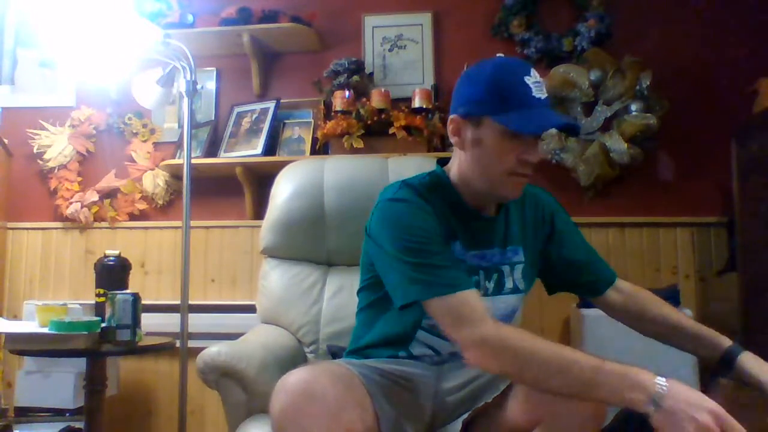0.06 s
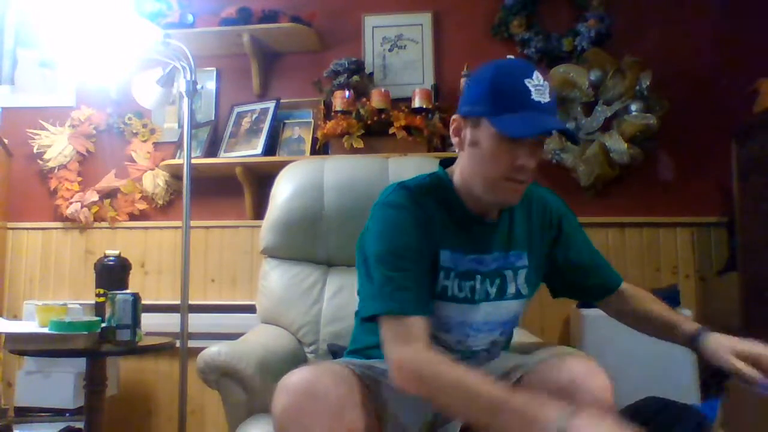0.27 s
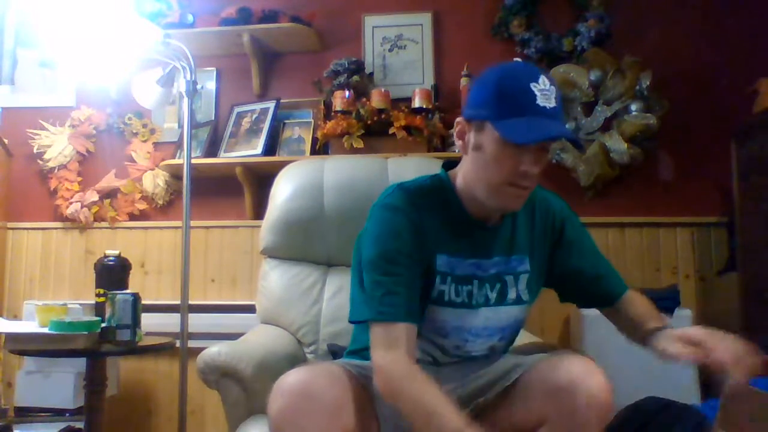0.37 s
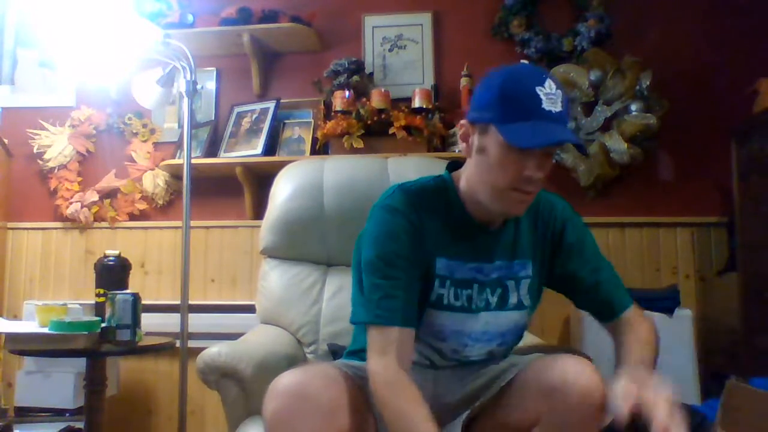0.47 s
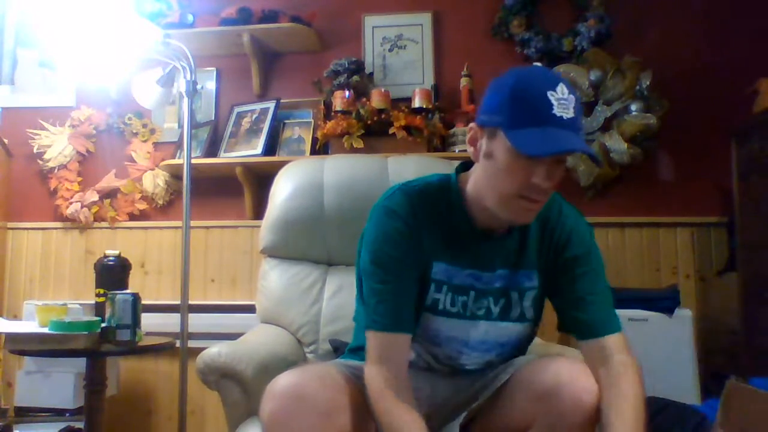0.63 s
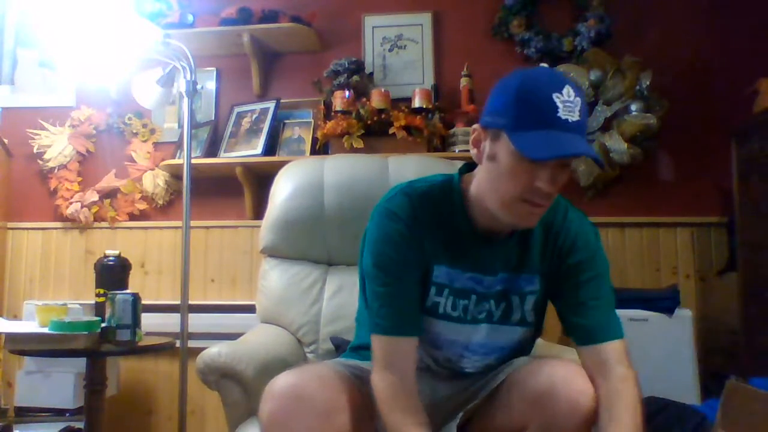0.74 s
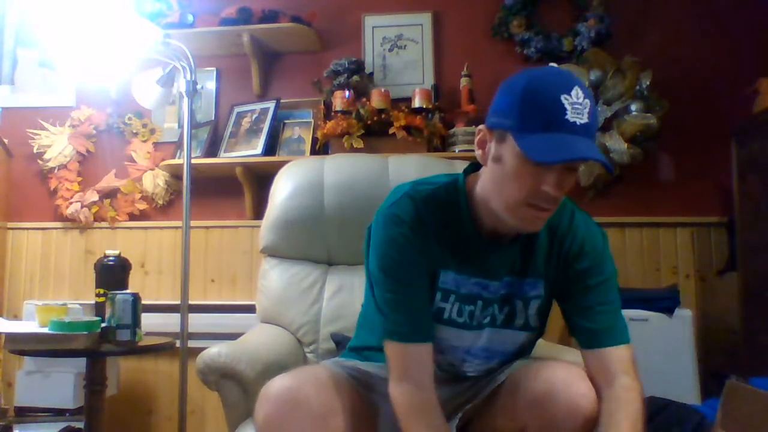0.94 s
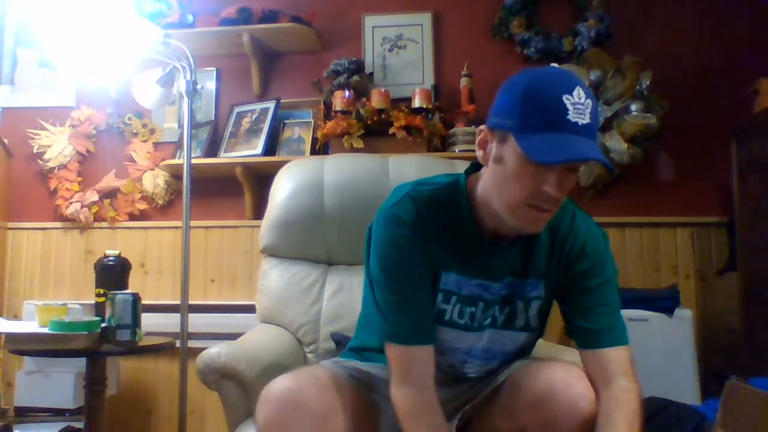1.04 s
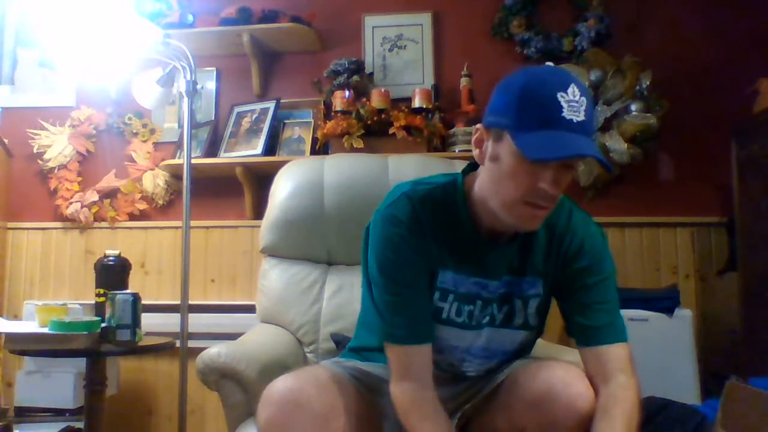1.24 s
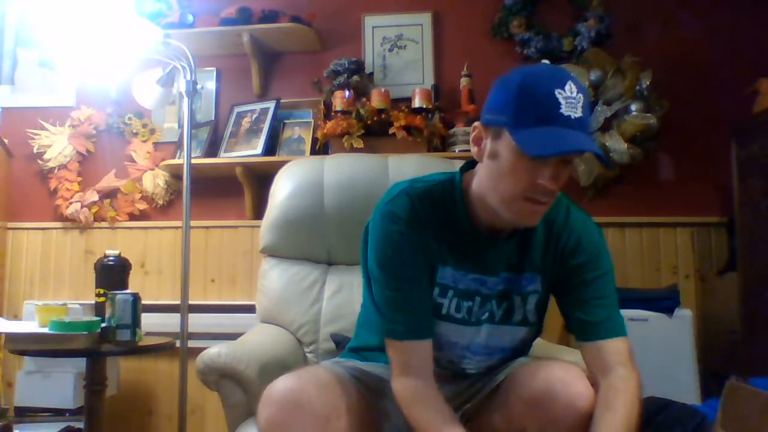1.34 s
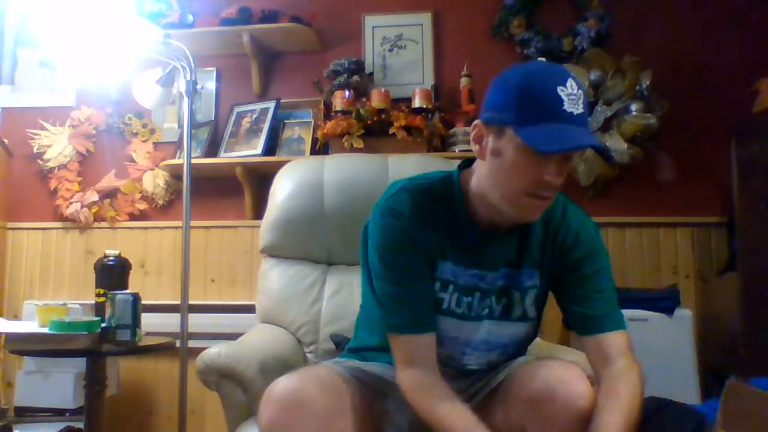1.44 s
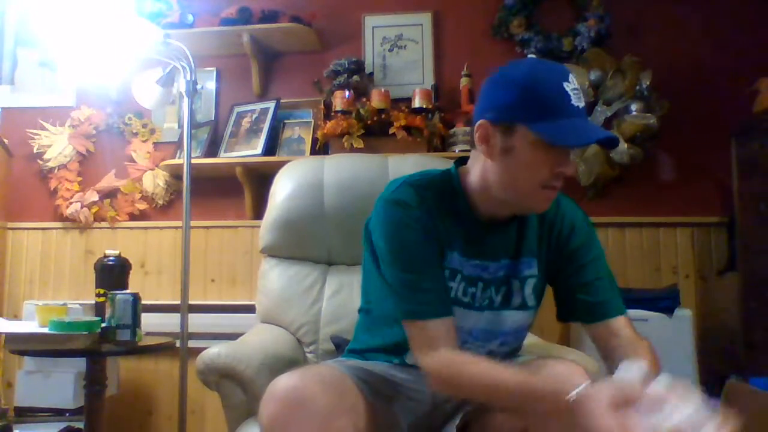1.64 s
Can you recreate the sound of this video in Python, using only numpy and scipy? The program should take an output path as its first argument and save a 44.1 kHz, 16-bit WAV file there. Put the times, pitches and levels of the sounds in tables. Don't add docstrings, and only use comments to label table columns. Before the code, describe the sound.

Foam packing pieces rustle and crunch in a cardboard box: first a short slide and low hollow thud as it lands, then repeated dense scoops with tiny squeaks, heard by a close webcam microphone in a small room.

```python
import sys
import numpy as np
from scipy import signal
from scipy.fft import rfft, irfft, dct, next_fast_len
from scipy.io import wavfile
from scipy.ndimage import uniform_filter1d

SR = 44100
rng = np.random.default_rng(int(sys.argv[2]) if len(sys.argv) > 2 else 0)


def undo_db(level):
    steps = np.asarray(level, float) / 20
    return 10 ** steps


def to_wav(sig):
    pcm = np.clip(np.atleast_2d(sig), -1, 1) * 32767
    pcm = np.round(pcm).astype(np.int16)
    wavfile.write(sys.argv[1], SR, pcm.T)


N = 74970


def unit(x):
    return x / np.sqrt(np.mean(x ** 2) + 1e-20)


def filtered(x, points):
    m = next_fast_len(N + SR // 4)
    hz, db = np.transpose(points)
    gain_db = np.interp(np.log(np.fft.rfftfreq(m, 1 / SR) + 1), np.log(hz + 1), db)
    return irfft(rfft(x, m) * undo_db(gain_db), m)[..., :N]


def rush(spectrum, patchy_db):
    z = signal.stft(rng.standard_normal(N + 512), nperseg=256)[2]
    field = uniform_filter1d(rng.standard_normal(z.shape), size=4, axis=0)
    field = uniform_filter1d(field, size=5, axis=1)
    noise = signal.istft(z * undo_db(patchy_db * unit(field)), nperseg=256)[1][:N]
    return unit(filtered(noise, [(20, -120)] + list(spectrum) + [(20000, -120)]))


def room_tone():
    # freq_hz, density_db [dB per Hz]
    tone_spectrum = [(40, -32), (100, -15), (330, -13), (1050, -14), (1600, -14.5), (2200, -27),
                     (5000, -46), (11000, -42)]
    whine = undo_db(-71) * np.sin(2 * np.pi * 3370 * np.arange(N) / SR)
    return undo_db(-54) * rush(tone_spectrum, patchy_db=1.0) + whine


def room(x):
    # freq_hz, t60_s
    decay = [(100, 0.84), (1000, 0.41), (8000, 0.32)]
    hz, t, z = signal.stft(rng.standard_normal(SR // 2), SR, nperseg=256)
    f, t60 = np.transpose(decay)
    t60 = np.interp(np.log(hz + 1), np.log(f), t60)[:, None]
    tail = signal.istft(z * undo_db(-60 * t / t60), SR, nperseg=256)[1]
    return signal.fftconvolve(np.pad(x, (300, 0)), tail / np.linalg.norm(tail))[:N]


def strokes():
    # peak_s, level_db, rise_s, hold_s, dig [0-1, deep digs are duller]
    hand_strokes = [(0.11, -38.5, 0.088, 0.023, 0.46), (0.182, -40, 0.038, .03, 1),
                    (0.215, -32, 0.026, 0.052, 0.7), (.546, -39, 0.0041, 0.0086, 0),
                    (0.567, -31.5, 0.023, 0.0084, 0.05), (0.62, -34.5, 0.014, 0.0073, 0),
                    (0.738, -40, 0.044, 0.025, 0), (0.804, -27, 0.04, 0.054, 0.57),
                    (0.887, -31.5, 0.023, 0.01, 0), (0.956, -24, 0.079, 0.032, 0.79),
                    (1.023, -32, 0.058, 0.039, 0.9), (1.111, -33, 0.06, .03, 1),
                    (1.139, -29.5, 0.067, 0.062, 0.73), (1.261, -29, 0.057, 0.01, 0.59),
                    (1.301, -33, 0.04, 0.085, 0.58), (1.41, -29, 0.01, 0.022, .1),
                    (1.462, -34.5, 0.05, 0.056, 0.24), (1.616, -38.5, 0.072, .012, 0.1)]
    rise_shape, release_t60_s = 0.72, 0.19
    t = np.arange(N) / SR
    peak, db, rise, hold, dig = np.transpose(hand_strokes)[:, :, None]
    swell = np.clip(1 - (peak - t) / rise, 0, 1) ** rise_shape
    since_hold = np.clip(t - peak - hold, 0, None)
    power = (swell * undo_db(db - 60 * since_hold / release_t60_s)) ** 2
    dig = np.clip(dig, 0, 1)
    return np.sqrt((power * (1 - dig)).sum(0)), np.sqrt((power * dig).sum(0))


def landing():
    # start_s, level_db
    contacts = [
        (0.202, -33),
        (.2115, -16.5),
        (.221, -11.5),
        (.237, -15.5),
        (.256, -21.5),
        (.275, -31.5),
        (.294, -25.5),
        (.316, -26.5),
        (.345, -35.5),
        (0.386, -38),
    ]
    # pitch_hz, level_db, t60_s
    walls = [(35, -13, .15), (96.9, -11.5, 0.22), (135.6, -10, 0.26), (176.3, -12, 0.3),
             (190.4, -3.5, 0.24), (247, 7.5, 0.088), (311, -13, 0.156), (333.5, -24, 0.82),
             (441, -21, 0.13), (603, -12, 0.062), (684, -7, 0.056), (749, -6, 0.07), (888, -22, 0.093),
             (1157.5, -18.5, 0.19)]
    # freq_hz, density_db [dB per Hz]
    flap = [(200, -27), (400, -4), (750, -3), (1100, -10.5), (2400, -13.5), (3200, -28), (6000, -40)]
    attack_s, flap_db, flap_t60_s, detune = 0.0018, -26, 0.24, 0.022
    t = np.arange(SR) / SR
    ringing, slap_power = np.zeros(N + SR), np.zeros(N + SR)
    for s, db in contacts:
        ring = np.zeros(SR)
        for hz, level, t60 in walls:
            decay = undo_db(level + rng.normal(0, 1) - 60 * t / t60)
            ring += decay * np.sin(2 * np.pi * hz * (1 + detune * rng.normal()) * t)
        start = round(s * SR)
        ringing[start:][:SR] += undo_db(db) * ring * (1 - np.exp(-t / attack_s))
        slap_power[start:][:SR] += undo_db(db - contacts[1][1] - 60 * t / flap_t60_s) ** 2
    return ringing[:N] + undo_db(flap_db) * np.sqrt(slap_power[:N]) * rush(flap, patchy_db=3.0)


def settling():
    # start_s, level_db
    flap_ticks = [
        (.36, -46),
        (.425, -47),
        (.47, -48),
        (.497, -48),
    ]
    pitch_hz, length_s = 1040, .009
    t = np.arange(N) / SR
    out = np.zeros(N)
    for s, db in flap_ticks:
        out += undo_db(db) * np.exp(-((t - s) / length_s) ** 2) * np.sin(2 * np.pi * pitch_hz * (t - s))
    return out


def sliding():
    # freq_hz, density_db [dB per Hz]
    drag_spectrum = [(60, -21), (95, -3), (200, -13), (450, -14), (760, -1), (950, -12.5), (1500, -11),
                     (3000, -19)]
    start_s, end_s, level_db = -.01, .215, -45.5
    t = np.arange(N) / SR
    drag = np.clip((t - start_s) / .03, 0, 1) * np.clip((end_s - t) / 0.0067, 0, 1)
    return undo_db(level_db) * drag * rush(drag_spectrum, patchy_db=1.0)


def shaken_walls():
    # freq_hz, density_db [dB per Hz]
    rumble = [(18, -70), (30, -40), (96, 0.5), (318, -11.5), (362, -33), (455, -24.5), (900, -15.5),
              (1170, -10), (1980, -120)]
    level_db, follows = -53.5, 0.51
    motion = unit(np.hypot(*strokes()) ** follows)
    return undo_db(level_db) * motion * rush(rumble, patchy_db=1.5)


def box():
    return landing() + settling() + shaken_walls() + sliding()


def ticks(per_s, centre_hz, life_cycles, count, size):
    spread, scatter_db = 0.6145, 4
    u, g = rng.random((count, 2)), rng.standard_normal(count)
    live = np.arange(count) < per_s * N / SR
    hz = np.clip(centre_hz * np.exp(spread * g), 700, 11500)[:, None]
    k = np.arange(size)
    cycles = hz * k / SR
    level = (live * undo_db(-scatter_db * np.log(u[:, 1] + .01)))[:, None]
    envelope = cycles / life_cycles * np.exp(-2 * cycles / life_cycles) * (1 - k / size)
    grain = level * np.sin(2 * np.pi * cycles) * envelope
    where = (u[:, :1] * N).astype(int) + k
    return unit(np.bincount(where.ravel(), grain.ravel())[:N])


def squeaks():
    # peak_s, pitch_hz, level_db, length_s
    rubs = [
        (1.403, 8150, -20, .006),
        (1.409, 8400, -22, .004),
        (.986, 2150, -28, .014),
        (.964, 4700, -30, .012),
        (1.268, 5000, -33, .008),
        (.806, 4080, -33, .02),
        (.83, 2250, -34, .014),
    ]
    t = np.arange(N) / SR
    out = np.zeros(N)
    for s, hz, db, length in rubs:
        waver = np.cumsum(rng.standard_normal(N)) * .02
        out += undo_db(db) * np.exp(-((t - s) / length * 2) ** 2) * np.sin(2 * np.pi * hz * t + waver)
    return out


def foam():
    # freq_hz, density_db [dB per Hz]
    light_rub = [(180, -45), (300, 2), (367, -11), (708, -2), (894, 2), (1060, -2.5), (10500, -1),
                 (11400, -11), (12500, -66), (16200, -92), (22000, -120)]
    # freq_hz, density_db [dB per Hz]
    deep_rub = [(180, -24), (300, -12), (373, -24), (494, -9.5), (719, -12), (2250, -3.5), (10200, -20),
                (11400, -17), (12500, -55), (16200, -96), (22000, -120)]
    light, deep = strokes()
    grains = undo_db(-6) * ticks(per_s=3500, centre_hz=4753, life_cycles=4.03, count=8000, size=400)
    grains += undo_db(-10) * ticks(per_s=300, centre_hz=3000, life_cycles=45, count=800, size=1500)
    hiss = light * rush(light_rub, patchy_db=1.93) + deep * rush(deep_rub, patchy_db=1.63)
    return undo_db(-3) * (hiss + np.hypot(light, deep) * grains + squeaks())


def scene():
    rustle, thud = foam(), box()
    foam_wet_db, box_wet_db = -11, -12
    wet = room(undo_db(foam_wet_db) * rustle + undo_db(box_wet_db) * thud)
    return (rustle + thud + wet + room_tone())[None]


def thinned(x):
    # centre_s, kept_share [0-1], favour_db [high lines, dB per octave], leak_db [the rest]
    moments = [
        (.145, .18, 1, -18),
        (.187, .1, 1.5, -35),
        (.271, .18, 4, -20),
        (.996, .18, 1.5, -16),
        (1.08, .2, 2, -14),
        (1.421, .13, 2, -30),
        (1.553, .17, 1, -16),
    ]
    length_s, fade_s = .012, .006
    out, t, line = x.copy(), np.arange(-512, 512) / SR, np.arange(1024)
    inside = np.clip((length_s / 2 - np.abs(t)) / fade_s + 1, 0, 1)
    for s, kept, favour_db, leak_db in moments:
        where = slice(round(s * SR) - 512, round(s * SR) + 512)
        z = dct(x[where], norm="ortho")
        rank = np.abs(z) * undo_db(favour_db * np.log2(line + 8))
        survives = (rank > np.quantile(rank[:490], 1 - kept)) | (line > 490)
        thin = dct(z * np.where(survives, 1, undo_db(leak_db)), type=3, norm="ortho")
        out[where] += inside * (thin * 1.2 - x[where])
    return out


def roll_off(x):
    return signal.sosfilt(signal.butter(12, 12670, fs=SR, output="sos"), x)


def record(dry):
    # freq_hz, gain_db
    mic = [(20, -24), (60, -5.5), (100, -1.5), (2700, -2), (3250, -3.5), (4000, 4), (11000, 5),
           (11700, -11), (12600, -45)]
    hiss = undo_db(-66) * rng.standard_normal(N)
    mix = filtered(thinned(dry[0] + hiss)[None], mic)
    return roll_off(mix)


dry = scene()
out = record(dry)
to_wav(out)
```